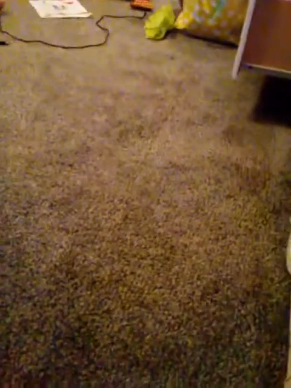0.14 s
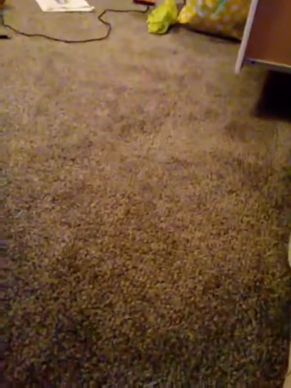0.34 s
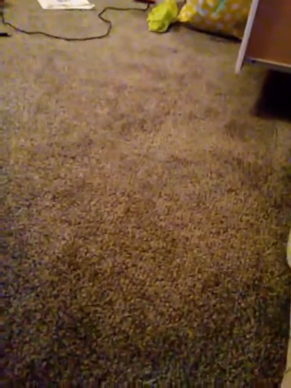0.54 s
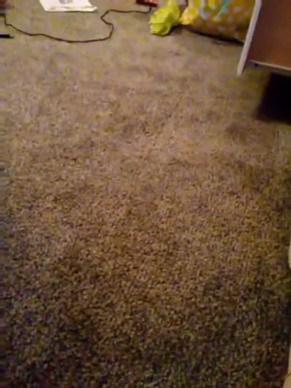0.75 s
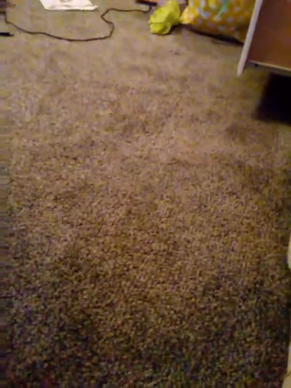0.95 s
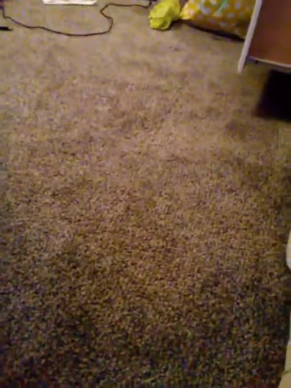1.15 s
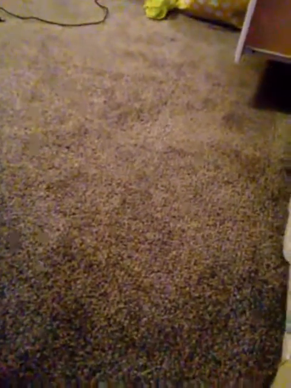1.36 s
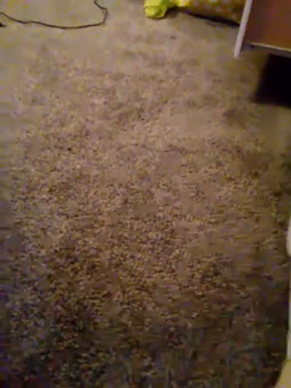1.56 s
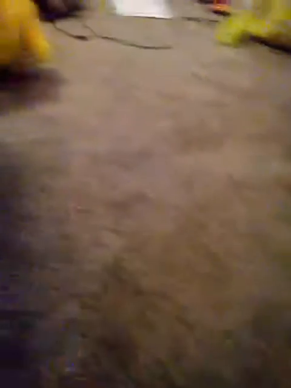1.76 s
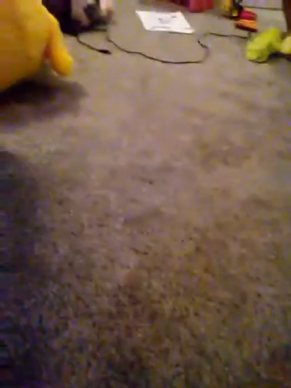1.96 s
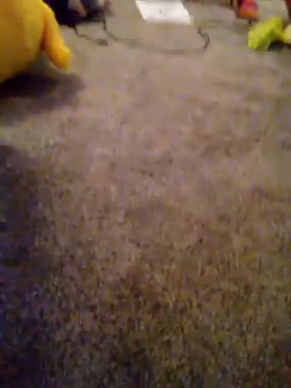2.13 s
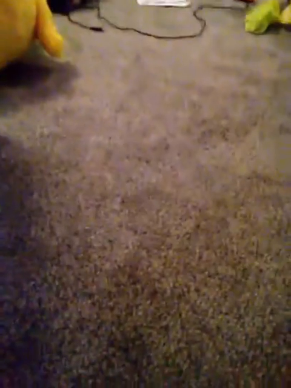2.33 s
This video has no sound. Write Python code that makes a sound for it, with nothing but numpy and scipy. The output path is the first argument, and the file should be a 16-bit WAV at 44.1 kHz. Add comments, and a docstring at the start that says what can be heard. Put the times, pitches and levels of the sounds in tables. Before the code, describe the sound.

Three quick, high squeaks from a squeezed rubber toy, close up in a quiet room.

```python
"""A rubber toy is squeezed close to a phone in a carpeted bedroom, over faint room noise and hum.
First the end of one squeak, then two whole ones at 0.24 s and 0.61 s: the reed snaps open, sings while
the pressure lasts, then sags in pitch and turns rough as it stalls. Air hisses through it in between
and dies away near 0.9 s. From 1.16 s come a few soft handling bumps, from 1.6 s a rustle of clothing."""
import sys
import numpy as np
from scipy import signal
from scipy.fft import rfft, irfft
from scipy.io import wavfile
from scipy.ndimage import uniform_filter1d, minimum_filter1d

SR = 44100
rng = np.random.default_rng(int(sys.argv[2]) if len(sys.argv) > 2 else 0)


def log_audio(samples):
    """Write samples as a 16-bit WAV file to the path given in sys.argv[1]."""
    # one column per channel
    frames = np.atleast_2d(samples).T
    # limit to full scale, then quantise
    limited = np.clip(frames, -1, 1)
    pcm = np.round(limited * 32767).astype(np.int16)
    wavfile.write(sys.argv[1], SR, pcm)


N = 109897
T = np.arange(N) / SR


def undb(db):
    """Decibels to gain."""
    return 10 ** (np.asarray(db) / 20)


def unit_rms(x):
    """Scale to rms 1."""
    return x / np.sqrt(np.mean(x ** 2) + 1e-20)


def gain_at(hz, spectrum):
    """Gain of a (frequency [Hz], level [dB]) table, interpolated in log frequency."""
    freqs, db = np.array(spectrum, float).T
    return undb(np.interp(np.log(hz + 1e-6), np.log(np.sort(freqs)), db))


def noise(shape):
    """Noise of rms 1 with amplitude spectrum shape(frequency)."""
    white = rfft(rng.standard_normal(N))
    return unit_rms(irfft(white * shape(np.fft.rfftfreq(N, 1 / SR)), N))


def coloured(spectrum):
    """Noise of rms 1 shaped by a spectrum table."""
    return noise(lambda f: gain_at(f, spectrum))


def wander(hz):
    """Random motion of rms 1, rolling off above hz."""
    return noise(lambda f: np.exp(-(f / hz) ** 2))


def bursts(events, spectrum, half_s):
    """Bell-shaped bursts of coloured noise."""
    envelope = sum(undb(db) * np.exp(-((T - time) / half_s) ** 2) for time, db in events)
    return envelope * coloured(spectrum)


# room hum (frequency [Hz], level [dB])
HUM_TONES = [(239.5, -68), (388, -75.5), (479, -73.5), (840, -72)]
# room noise (frequency [Hz], relative density [dB])
ROOM_SPECTRUM = [(25, -18), (60, -8), (130, -11.5), (240, -2.5), (340, -6.5), (520, -2.5), (680, -5.5),
                 (860, 2.5), (1100, -9.5), (1500, -10.5), (3950, -15.5), (4600, -39), (5600, -33.5),
                 (7500, -34.5), (11000, -29.5), (15500, -27.5)]


def room_noise():
    """Faint noise and hum; their level flutters together."""
    floor_db, flutter_db = -57, 1
    hum = sum(undb(db) * unit_rms(np.sin(2 * np.pi * hz * T)) for hz, db in HUM_TONES)
    flutter = undb(flutter_db * wander(hz=59))
    return flutter * (hum + undb(floor_db) * coloured(ROOM_SPECTRUM))


# rustle envelope (time [s], level [dB])
RUSTLE_ENVELOPE = [(1.58, -76), (1.68, -53), (1.8, -54.5), (1.95, -56.5), (2.03, -60), (2.12, -86)]
# cloth noise (frequency [Hz], relative density [dB])
CLOTH_SPECTRUM = [(150, -7.5), (500, 0.5), (1000, 0.5), (2500, -6), (4000, -3), (4500, -26.5),
                  (5500, -29.5), (6700, -9.5), (9000, -11.5), (12000, -16.5), (15000, -33)]


def clothing_rustle():
    """Clothing rustles as the holder turns."""
    flicker_db = .7
    times, db = np.array(RUSTLE_ENVELOPE).T
    return undb(np.interp(T, times, db) + flicker_db * wander(hz=45)) * coloured(CLOTH_SPECTRUM)


# hand bumps (time [s], level [dB])
BUMP_EVENTS = [(1.164, -54), (1.413, -73), (1.707, -54), (2.07, -55)]
# bump noise (frequency [Hz], relative density [dB])
BUMP_SPECTRUM = [(100, -8), (300, -3), (950, 8), (1400, -11), (4000, -9), (4600, -28), (15000, -26)]


def handling_bumps():
    """Soft bumps of the hand."""
    return bursts(BUMP_EVENTS, BUMP_SPECTRUM, half_s=.008)


# air through the silent reed (start [s], end [s], initial level [dB])
AIR_FLOWS = [(0, 0.161, -53), (.375, 0.5, -53), (.545, .61, -50.5), (.69, 0.891, -51)]
# air hiss (frequency [Hz], relative density [dB])
AIR_SPECTRUM = [(3000, -49), (4800, -25.5), (5700, -27), (6200, -3), (7000, -8.5), (7900, -6.5),
                (8500, -13), (9300, -7.5), (10300, -20.5), (13000, -19), (15500, -22), (17000, -49.5)]


def air_hiss():
    """Air too slow to sound the reed hisses through it, easing as the pressure evens out."""
    attack_s, release_s, fade_db_per_s = .035, .016, 25.5
    flow = 0
    for start, end, db in AIR_FLOWS:
        attack = np.clip((T - start) / attack_s, 0, 1)
        release = np.exp(-np.maximum(T - end, 0) / release_s)
        flow += attack * release * undb(db - fade_db_per_s * (T - start))
    return flow * coloured(AIR_SPECTRUM)


# breathy whistles (time [s], half length [s], centre [Hz], half width [Hz], level [dB])
WHISTLE_EVENTS = [(0.634, .016, 10560, 330, -30.5), (0.649, 0.016, 9230, 600, -33)]


def air_whistles():
    """Air over the reed in a hard squeeze: narrow bands of hiss swell and fade."""
    out = 0
    for time, half_s, centre_hz, half_hz, db in WHISTLE_EVENTS:
        swell = undb(db) * np.exp(-((T - time) / half_s) ** 2)
        out += swell * noise(lambda f: np.exp(-((f - centre_hz) / half_hz) ** 2))
    return out


# reed openings (time [s], level [dB])
POP_EVENTS = [(.2445, -29), (.609, -18.5)]
# pop noise (frequency [Hz], relative density [dB])
POP_SPECTRUM = [(50, -24), (400, -10), (800, -4.5), (1300, -4), (2600, -6), (5000, -3), (8000, -6),
                (11000, -25.5), (16000, -30.5)]


def reed_pops():
    """The reed snaps open at the start of a squeak."""
    return bursts(POP_EVENTS, POP_SPECTRUM, half_s=.002)


# reed motion, one track per squeak (time [s], pitch [Hz], level [dB], roughness [0-1])
SQUEAK_TRACKS = [
    [(0, 1026, -1.5, 0.92), (.005, 984.6, -4.5, 1), (.011, 950, -3.5, .9), (.024, 940, -40.5, .8)],
    [(.2405, 950, -28, .3), (.2455, 1080, 4, .15), (.258, 1094, 1, .06), (.277, 1107, 7.5, .05),
     (.298, 1109, 3, .05), (.32, 1095, 3, .06), (.343, 1057, 1.5, 0.3), (.358, 1005, 1.5, .5),
     (.367, 960, -1.5, .75), (.38, 930, -32, 0.8)],
    [(.6055, 930, -11.5, .3), (.6105, 1068, 12.5, .15), (.625, 1067, 3.5, .06), (.642, 1059, 4, .08),
     (.66, 1034, 3.5, 0.31), (.674, 995, -3.5, .35), (.685, 937, -1.5, .7), (.696, 920, -39, .8)],
]
# toy's radiation of a partial (frequency [Hz], gain [dB])
TOY_RESPONSE = [(900, -14), (1100, -19.5), (1900, -22), (2120, -30.5), (2220, -37.5), (2900, -27),
                (3100, -19), (3300, -18), (3900, -25.5), (4430, -22), (4800, -15), (5300, -19.5),
                (5520, -8.5), (5950, -22.5), (6300, -9), (6600, -8), (7000, -12.5), (7420, -8.5),
                (7640, -26.5), (7750, -33), (7980, -16), (8220, -26), (8500, -31.5), (9550, -26),
                (10000, -50), (11100, -42.5), (11700, -53.5), (12200, -44.5), (13000, -43), (14300, -56.5),
                (15500, -53)]
# air past the singing reed (frequency [Hz], relative density [dB])
RUSH_SPECTRUM = [(100, -17.5), (700, -25), (2500, -20.5), (4500, -9.5), (6500, -1), (8700, -8),
                 (10200, -15), (12000, -29), (16000, -34.5)]


def reed_squeak(track):
    """The reed's partials sweep through the toy's resonances, with a rush and a low puff of air."""
    partials, dispersion_rad = 14, np.pi / 5
    rush_db, puff_db = -35, -58.5  # relative to the track level
    # depths at full roughness, as the reed stalls
    jitter, shimmer, waver_db, rush_rise_db = .013, .097, 5, 9
    thin_db, thin_below_hz = 1.5, 3500
    dull_db, dull_above_hz = 6, 10060

    times, hz, db, roughness = np.array(track, float).T
    sounding = (T >= times[0] - 1 / SR) * (T <= times[-1])
    envelope = undb(np.interp(T, times, db)) * sounding
    rough = np.clip(np.interp(T, times, roughness), 0, 1)
    pitch_hz = np.interp(T, times, hz)
    jittered_hz = pitch_hz * (1 + jitter * rough * wander(hz=400))
    phase = 2 * np.pi * np.cumsum(jittered_hz) / SR
    tone = 0
    for k in range(1, partials + 1):
        partial_hz = k * pitch_hz
        low_cut_db = thin_db * (partial_hz < thin_below_hz)
        top_cut_db = dull_db * np.clip(10 * (partial_hz / dull_above_hz - 1), 0, 1)
        falter_db = rough * (waver_db * (wander(hz=70) - .5) - low_cut_db - top_cut_db)
        gain = gain_at(partial_hz, TOY_RESPONSE) * undb(falter_db)
        tone += gain * np.sin(k * phase + dispersion_rad * k * k)
    tone *= 1 + shimmer * rough * wander(hz=250)
    rush = undb(rush_db + rush_rise_db * rough) * coloured(RUSH_SPECTRUM)
    puff = undb(puff_db) * wander(hz=60)
    return envelope * (tone + rush + puff)


def bedroom(direct):
    """Adds quick scatter from things close by and a short, soft tail from walls and furniture."""
    def reflections(db, t60_s, gap_s):
        t = T[:SR // 2]
        tail = rng.standard_normal(len(t)) * np.exp(-np.log(1000) * t / t60_s) * (t > gap_s)
        return undb(db) * signal.fftconvolve(direct, tail / np.linalg.norm(tail))[:N]

    scatter = reflections(db=-23, t60_s=.04, gap_s=0)
    walls = reflections(db=-15, t60_s=.155, gap_s=.004)
    return direct + scatter + walls


def scene():
    """Toy, room and handling, the same in both channels."""
    toy = sum(reed_squeak(track) for track in SQUEAK_TRACKS) + reed_pops() + air_whistles()
    mono = bedroom(toy) + air_hiss() + room_noise() + clothing_rustle() + handling_bumps()
    return np.array([mono, mono])


def record(dry):
    """The phone's fast limiter holds the peaks; a low-pass cuts the top."""
    ceiling, hold_s, cutoff_hz = .99, .0015, 15700
    hold = int(hold_s * SR)
    needed_gain = ceiling / np.maximum(np.abs(dry), ceiling)
    gain = uniform_filter1d(minimum_filter1d(needed_gain, hold), hold)
    lowpass = signal.ellip(8, .2, 70, cutoff_hz, fs=SR, output="sos")
    return signal.sosfilt(lowpass, dry * gain)


dry = scene()
out = record(dry)
log_audio(out)
```